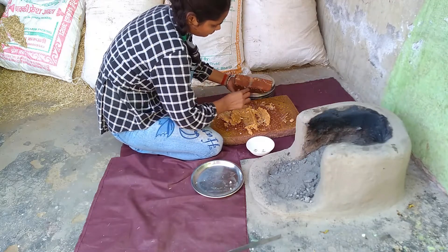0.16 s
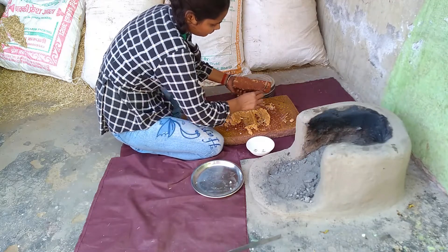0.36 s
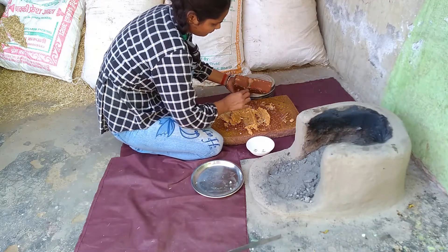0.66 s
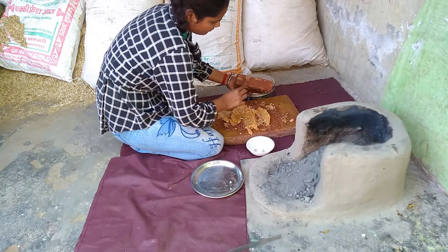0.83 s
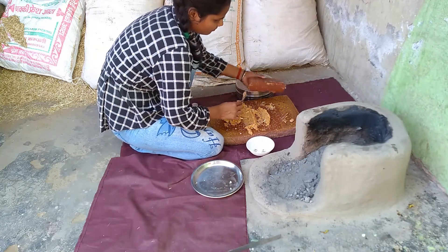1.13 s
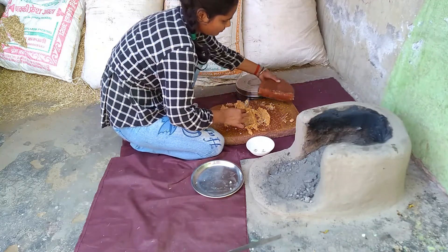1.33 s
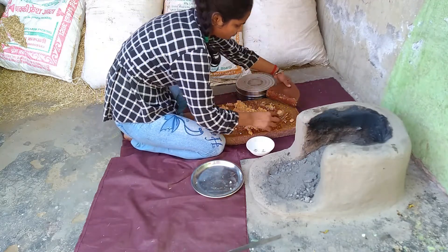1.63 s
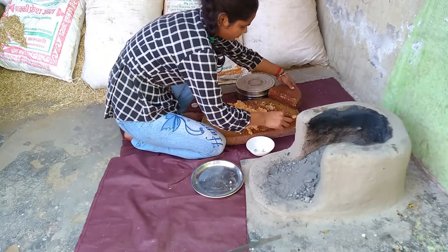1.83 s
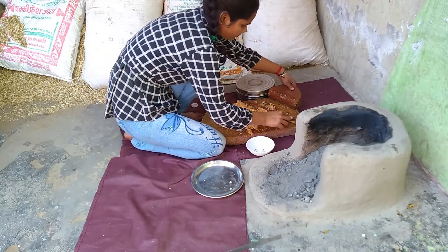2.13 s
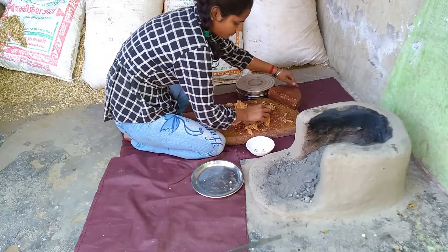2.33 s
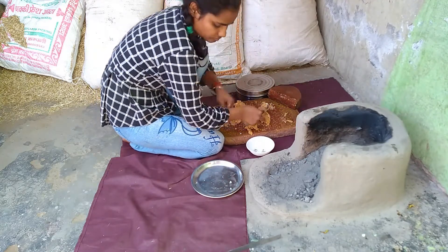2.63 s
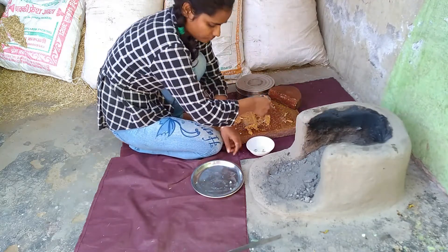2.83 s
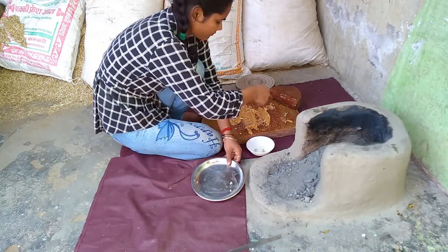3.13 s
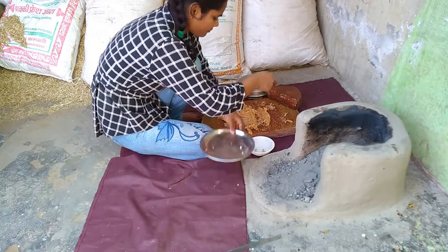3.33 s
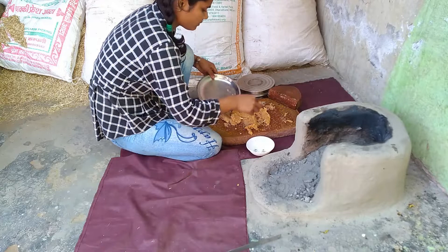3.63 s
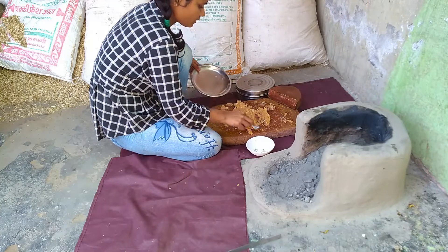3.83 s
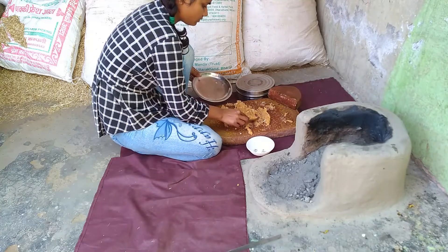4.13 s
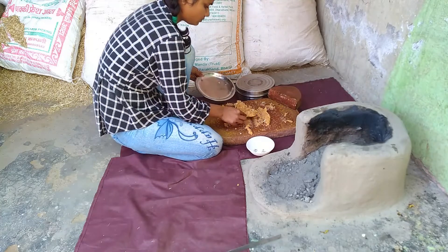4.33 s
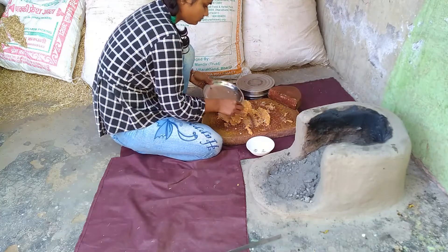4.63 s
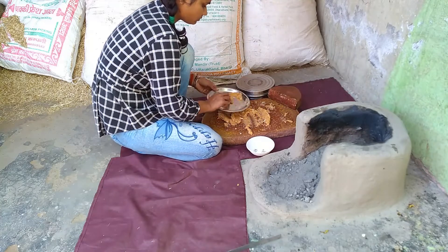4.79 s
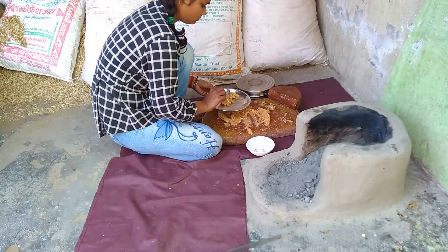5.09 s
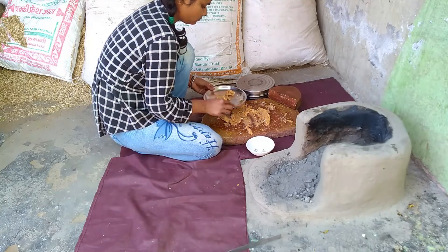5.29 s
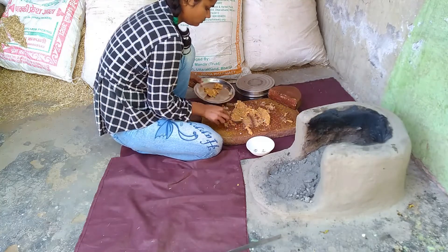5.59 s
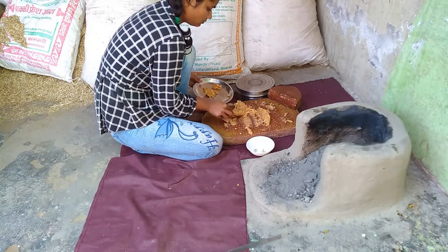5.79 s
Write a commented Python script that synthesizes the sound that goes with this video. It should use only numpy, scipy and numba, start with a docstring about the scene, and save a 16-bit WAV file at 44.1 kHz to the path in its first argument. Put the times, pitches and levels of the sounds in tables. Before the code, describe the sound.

In a small hard-walled room, fingers wipe mash off a stone roller in three short gritty strokes with tiny glass bangle chinks. The roller lands on the slab with dull knocks, then one sharp, loud clack. Quieter smears, finger scrapes and a soft rasp on a steel plate follow. Close microphone, low rumble and faint hiss.

```python
"""Fingers wipe mash off a stone roller in three gritty strokes at a grinding slab in a small room:
friction is a train of tiny random slips, shaped by resonances and by a pressure curve for each stroke.
Stone knocks, bangle chinks, plate taps and dull bumps are impacts that excite decaying modes.
Smears, slab scrapes, roller drags, sleeve rustles and a wiped steel plate are further friction.
Noise reflections place all this in the room, over a quiet rumble and hiss."""
import sys
import numpy as np
from scipy import signal
from scipy.fft import rfft, irfft, next_fast_len
from scipy.io import wavfile
from numba import njit

SR = 44100
rng = np.random.default_rng(int(sys.argv[2]) if len(sys.argv) > 2 else 0)


def dump(signal):
    """Clip the signal to [-1, 1] and save it as 16-bit WAV at the path in sys.argv[1]."""
    limited = np.clip(np.atleast_2d(signal).T, -1, 1)
    pcm = np.round(limited * 32767).astype(np.int16)
    wavfile.write(sys.argv[1], SR, pcm)


N = 262395
TIME = np.arange(N) / SR
RING_TIME = TIME[:SR]

# Levels are relative, before the trims of each layer and the room.
# Fingers scraping the slab: (start [s], attack [s], hold [s], fade [dB/s], peak level [dB],
# swell up to the peak [dB], treble relative to the body [dB], pitch ratio of the rings at the start)
SLAB_STROKES = [(4.005, 0.013, 0.045, 91, -43, 10, 0, .88), (5.617, 0.03, 0.07, 288, -38.5, 3.5, 0, 0.92)]


def undb(db):
    """Logarithmic level: decibels to an amplitude ratio."""
    return np.exp(np.asarray(db) * (np.log(10) / 20))


def unit(x):
    """Effective value: scale to rms 1."""
    return x / np.sqrt(np.mean(x ** 2))


def attack_unit(x, size=441):
    """Onset level: scale a blow to rms 1 over its first samples."""
    return x / np.sqrt(np.mean(x[:size] ** 2))


def add(out, s, x):
    """Superposition: mix a sound in at a time; a start before 0 becomes 0."""
    i = max(int(s * SR), 0)
    out[i:i + len(x)] += x[:N - i]


def colour(x, points):
    """Spectral envelope: zero-phase filter through points of (frequency [Hz], level [dB])."""
    hz, db = np.transpose(points)
    size = next_fast_len(len(x) + SR // 10)
    f = np.maximum(np.fft.rfftfreq(size, 1 / SR), 1)
    gain = undb(np.interp(np.log(f), np.log(hz), db))
    return irfft(rfft(x, size) * gain, size)[:len(x)]


def band(x, hz, width):
    """Simple resonator: one resonance of gain 1 at its centre."""
    quality = hz / min(width, SR / 4)
    return signal.lfilter(*signal.iirpeak(hz, quality, fs=SR), x)


def lowpass(x, hz, order=2):
    """Low-pass filtering: causal Butterworth roll-off above the cut-off."""
    return signal.sosfilt(signal.butter(order, min(hz, SR / 2 - 1), fs=SR, output="sos"), x)


def highpass(x, hz, order):
    """High-pass filtering: causal Butterworth roll-off below the cut-off."""
    return signal.sosfilt(signal.butter(order, hz, "high", fs=SR, output="sos"), x)


def resonate(x, rings):
    """Parallel resonators: each band is passed twice for steeper sides, and the sum has rms 1."""
    return unit(sum(undb(db) * band(band(x, hz, width), hz, width) for hz, width, db in rings))


def fade(t60):
    """Exponential damping: 60 dB down after t60 seconds."""
    return np.exp(-np.log(1000) * RING_TIME / t60)


def ring(modes):
    """Modal superposition: damped sines, with random signs for where the thing is struck."""
    out = np.zeros(len(RING_TIME))
    for hz, db, t60 in modes:
        sign = rng.choice([-1, 1])
        out += sign * undb(db) * fade(t60) * np.sin(2 * np.pi * hz * RING_TIME)
    return out


def walk(rate):
    """Slow random modulation: line segments between normal values, rate knots per second."""
    knots = rng.standard_normal(N // 10)
    return np.interp(TIME * rate, np.arange(len(knots)), knots)


def friction(rate, spread_db, slip_hz, slip_db):
    """Stick-slip: rate slips per second of uneven size, in a level that wanders at slip_hz."""
    hit = rng.random(N) < rate / SR
    excess = np.minimum(rng.exponential(size=N), 2 * np.pi)
    sizes = undb(spread_db * excess) * rng.choice([-1, 1], N)
    return unit(hit * sizes * undb(slip_db * walk(slip_hz)))


def gesture(s, attack_s, hold_s, fade_db_per_s, db, swell_db=0):
    """Pressure envelope of a stroke: it grips, swells as the hand presses on, then fades steadily."""
    grip_db = 20  # rise in level while the fingers take hold
    let_go_s = 0.012  # the release is rounded over this time
    t, length_s = TIME[:2 * SR], attack_s + hold_s
    grip = grip_db * np.clip(1 - t / attack_s, 0, 1) ** 2
    press = swell_db * np.clip(1 - t / length_s, 0, 1)
    release = fade_db_per_s * let_go_s * np.logaddexp(0, (t - length_s) / let_go_s)
    out = np.zeros(N)
    add(out, s, undb(db - grip - press - release))
    return out


@njit
def moving_band(x, hz, width):
    """Time-varying resonator: a state-variable filter whose centre moves."""
    y, b, l = np.empty(len(x)), 0., 0.
    for i in range(len(x)):
        g, k = np.tan(np.pi * min(hz[i], .45 * SR) / SR), width / hz[i]
        v = (b + g * (x[i] - l)) / (1 + g * (g + k))
        b, l, y[i] = 2 * v - b, l + 2 * g * v, k * v
    return y


def contact(slips, rings, pitch, flare_db, flare_hz):
    """Contact resonance: slips excite resonances that share a moving pitch and flare one by one."""
    out = slips.copy()
    for hz, width, db in rings:
        flare = undb(db + flare_db * walk(flare_hz))
        out += flare * moving_band(slips, hz * pitch, float(width))
    return out


def rub(slips, points, strokes, low_hz, split_hz, treble_db):
    """Friction radiation: one pressure curve shapes each stroke; a fixed balance sets its brightness."""
    x = colour(slips, points)
    body = signal.sosfiltfilt(signal.butter(8, split_hz, fs=SR, output="sos"), x)
    treble = unit(x - body)
    # only the body above low_hz counts toward its level
    body = body / np.std(highpass(body, low_hz, order=8))
    out = np.zeros(N)
    for *shape, bright_db in strokes:
        out += gesture(*shape) * (body + undb(bright_db + treble_db) * treble)
    return out


def gritty_pushes():
    """Coarse-grain friction: uneven slips of the fingers over bare stone excite its resonances."""
    # Gritty pushes of the fingers over bare stone, mostly the roller; the first two strokes along
    # the roller each get a second, harder push: (start [s], attack [s], hold [s], fade [dB/s],
    # peak level [dB], swell up to the peak [dB], treble relative to the body [dB])
    strokes = [(0.0, .022, 0.089, 183, -38, -1.5, -5), (0.049, 0.05, 0.05, 438.5, -29, 8.5, -5.5),
               (0.449, 0.027, .14, 216.5, -35.5, 0, -8.5), (0.527, 0.053, .02, 320, -24.5, 2.5, -4),
               (0.872, 0.054, 0.063, 278.5, -28, 0, -6.5), (2.609, 0.014, 0.043, 130.5, -65, -2.5, -10)]
    # Spectrum of the gritty friction: (frequency [Hz], level [dB])
    spectrum = [(240, -68.5), (400, -36), (1010, -29), (1250, -16.5), (1860, -11.5), (2010, -10.5),
                (2780, -7), (3000, -3), (4830, -4.5), (5300, -2), (6180, -10), (8670, -6.5), (10100, -18),
                (15100, -16.5), (15800, -29)]
    # Rings of the stone under the fingers: (frequency [Hz], width [Hz], level [dB])
    rings = [(2830, 63, -12.5), (5480, 170, 1), (7750, 210, 0), (8640, 1200, -4.5), (11300, 160, 6),
             (15230, 600, -3)]
    coarse = friction(rate=7500, spread_db=2.0, slip_hz=174.3, slip_db=1.0)
    slips = contact(coarse, rings, 1 + 0.0086 * walk(25), flare_db=0.5, flare_hz=44.1)
    return undb(-0.96) * rub(slips, spectrum, strokes, low_hz=1900, split_hz=6020, treble_db=0.0)


def bumps():
    """Damped impact: soft contacts give low thuds; small random ones jostle the roller in the hand."""
    # Dull jostling while the roller is wiped:
    # (start [s], attack [s], hold [s], fade [dB/s], peak level [dB])
    jostle = (-0.5, 0.1, 1.3, 119, -68)
    # Resonances of the jostling: (frequency [Hz], width [Hz], level [dB])
    jostle_rings = [(61.5, 16, -1), (105, 60, 0.5)]
    # Dull thuds of hands, knees and stone on the mat; the last is the plate being hit:
    # (time [s], level [dB], pitch [Hz])
    thuds = [(0.027, -47.5, 54.5), (.344, -54.5, 75), (.429, -50, 66), (0.676, -47.5, 49.6),
             (.865, -51, 70), (1.077, -37.5, 64), (1.093, -40.5, 185), (1.104, -44, 101), (1.169, -42, 56),
             (1.207, -49.5, 78), (1.286, -51, 68), (1.557, -54, 90), (1.72, -56.5, 80), (2.297, -52, 105),
             (3.828, -62.5, 332), (3.858, -47.5, 70.5), (3.866, -49.5, 176), (4.476, -56.5, 58),
             (4.87, -58, 437)]
    # Heavily damped modes of each thud: (pitch ratio, level [dB])
    thud_modes = [(.6, -2), (0.999, 0), (1.55, -5)]
    nudges = lowpass(friction(rate=25, spread_db=4.0, slip_hz=12, slip_db=1), 140, order=4)
    out = gesture(*jostle) * resonate(nudges, jostle_rings)
    for s, db, hz in thuds:
        thud = ring([(hz * ratio, level, 0.16) for ratio, level in thud_modes])  # t60 0.16 s
        add(out, s, undb(db) * lowpass(thud, 2 * hz, order=3))
    return out


def mash_smearing():
    """Lubricated friction: mash under the fingers, on stone and later on the plate, hisses smoothly."""
    # Smears, also as the fingers slide off the roller and later wipe on the plate:
    # (start [s], attack [s], hold [s], fade [dB/s], peak level [dB],
    # swell up to the peak [dB], treble relative to the body [dB])
    strokes = [(0.195, 0.039, 0.038, 280, -56, 0, -8.5), (0.707, 0.025, .06, 229, -60, -5, -4.5),
               (1.087, .03, 0.023, 126, -67.5, -8, -0.5), (1.543, 0.028, .03, 199, -82.5, -1, 5.5),
               (1.709, 0.023, .32, 100.5, -78.5, 4, -7), (2.42, .03, 0.037, 122, -81.5, -5, 9),
               (2.512, 0.035, 0.05, 220, -64, 19, 1.5), (2.62, 0.05, 0.045, 262, -53, 12.5, -6.5),
               (2.987, 0.018, .01, 200, -81.5, -2, 8.5), (3.149, 0.052, 0.083, 289, -68.5, 13, 10),
               (4.226, 0.022, .21, 152, -50, 11, -7), (4.648, 0.019, 0.032, 314, -62.5, 0, 2),
               (4.822, 0.022, 0.023, 254, -67, 6, 2.5), (5.083, 0.11, 0.22, 276, -52.5, -1.5, -8),
               (5.812, 0.053, 0.12, 200, -55.5, 9.5, 0)]
    # Spectrum of the smears: (frequency [Hz], level [dB])
    spectrum = [(710, -44), (1200, -19), (1460, -33), (1660, -24), (1990, -17.5), (2420, -21.5),
                (3640, -11), (4150, -19.5), (5200, -6), (7840, 4), (14800, -24), (15800, -21.5)]
    smooth = friction(rate=25000, spread_db=3.0, slip_hz=58.0, slip_db=.5)
    return undb(-1.32) * rub(smooth, spectrum, strokes, low_hz=4020, split_hz=9030, treble_db=1.5)


def rasp(hz, width, t60):
    """Noise-excited resonance: a decaying burst of slips in one twice-filtered band."""
    slips = rng.standard_normal(SR)
    return unit(band(band(slips, hz, width), hz, width)) * fade(t60)


def catches():
    """Frequency-dependent damping: landings rasp broadly, catches narrowly and shorter when higher."""
    # A finger lands on the stone: (time [s], level [dB], centre [Hz])
    landings = [(.415, -33.5, 5970), (.841, -45.5, 4600), (3.957, -37.5, 8400), (5.726, -45, 7600)]
    # A finger catches on grit or a sticky lump: (time [s], level [dB], centre [Hz])
    snags = [(2.905, -66, 5850), (3.958, -58, 1250), (4.022, -60.5, 1230), (4.055, -63, 1235),
             (4.091, -45, 5020), (4.094, -66, 1140), (4.116, -38, 6720), (4.158, -32.5, 6540),
             (4.196, -42.5, 3950), (4.212, -47, 3770), (4.229, -43.5, 3940), (4.255, -66, 1150),
             (4.284, -51.5, 4230), (4.371, -50, 3900), (5.676, -34.5, 9960)]
    out = np.zeros(N)
    for s, db, hz in landings:
        add(out, s, undb(db) * rasp(hz, width=5700, t60=0.11))
    for s, db, hz in snags:
        t60 = 0.087 * (1000 / hz) ** 0.42  # 0.087 s at 1 kHz
        add(out, s, undb(db) * rasp(hz, 0.26 * hz, t60))
    return out


def bangles():
    """Modal excitation: each touch of the glass bangles favours other modes, slightly detuned."""
    # Bangles touch: (time [s], level [dB], tilt toward the high modes [dB/octave])
    chinks = [(.664, -46.5, -5), (.693, -47, 15), (0.744, -48.5, -8), (.825, -54, -8), (0.842, -46.5, -11),
              (1.021, -47, -20.5), (1.09, -50.5, -51), (2.225, -46, 5), (2.379, -48.5, -65),
              (2.417, -63, 7.5)]
    # Modes of the bangles: (frequency [Hz], level [dB], t60 [s])
    glass_modes = [(7840, -3, 0.061), (7360, -3, 0.15), (8430, -3.5, 0.29), (8480, -4, 0.21),
                   (9500, -10.5, 0.22), (9924, -19, .15)]
    first_hz = glass_modes[0][0]  # the tilt pivots here
    out = np.zeros(N)
    for s, db, tilt_db in chinks:
        modes = []
        for hz, level, t60 in glass_modes:
            detune = 1 + 0.0054 * rng.standard_normal()
            modes.append((hz * detune, level + tilt_db * np.log2(hz / first_hz), t60))
        add(out, s, undb(db) * attack_unit(ring(modes)))
    return band(out, 8300, 3500)


def knocks():
    """Impact of solids: a crack, modes and a dense short tail; a softer contact cuts the treble."""
    # The roller meets the slab, with mash between them at times: (time [s], level [dB],
    # contact cut-off [Hz], tilt [dB/octave], pitch ratio of the roller's modes)
    blows = [(1.086, -37, 1600, -3, .85), (1.094, -37, 1500, -3, .85), (1.127, -45, 1650, -2, .85),
             (1.5575, -25, 1700, -3, 1.03), (1.618, -46, 1000, -4, 1.0), (1.7182, -23.3, 2600, -1, 1.065),
             (1.75, -38, 1500, -2, 1.06), (1.8, -52, 3000, -1, 1.06), (2.295, -15, 6500, 0, 1.0)]
    # Modes of the two stones: (frequency [Hz], level [dB], t60 [s])
    stone_modes = [(209.6, -4, 0.11), (303, -8.5, .12), (413.3, -6.5, 0.15), (449, -8.5, 0.13),
                   (572, -16.5, 0.22), (654, -11.5, .14), (760, -7.5, 0.17), (826, -6, 0.12),
                   (928, -8, 0.2), (1068, -4.5, 0.19), (1099, -1.5, 0.053), (1216.5, -2, 0.12),
                   (1341, -9, 0.14), (1435, -8.5, 0.079), (1513, -15.5, 0.19), (1810, -7, 0.11),
                   (1990, 3, 0.21), (2090, -4.5, .1), (2270, -5.5, 0.074), (2664, -7.5, 0.24),
                   (2670, -10.5, 0.13), (3010, -14, 0.11), (3920, -12, .06), (4550, -15, 0.055),
                   (5750, -14.5, .05), (5810, -10.5, .06)]
    # Spectrum of the dense tail: (frequency [Hz], level [dB])
    tail_spectrum = [(59, -45.5), (100, -16.5), (576, -4.5), (1250, -4), (1680, -13), (2000, -7),
                     (2190, -13.5), (2650, -13), (2850, -16.5), (9000, -37.5), (11700, -70.5),
                     (19800, -120)]
    # A steel dish beside the slab, faint in each knock: (frequency [Hz], level [dB], t60 [s])
    dish_modes = [(1998, -49, .5), (2080, -48, .65), (2180, -47.5, 0.71)]
    roller_modes_hz = 1800  # modes above this belong to the roller and shift with how it is held
    crack_rings = [(430, 530, -2.5), (1200, 990, -2), (1897, 500, 1.0), (4620, 960, -16.5)]  # Hz, Hz, dB
    crack = attack_unit(resonate(signal.unit_impulse(SR), crack_rings))
    dish = ring(dish_modes)
    out = np.zeros(N)
    for s, db, contact_hz, tilt_db, ratio in blows:
        held = [(hz * (ratio if hz > roller_modes_hz else 1), level, t60) for hz, level, t60 in stone_modes]
        modes = attack_unit(ring(held))
        tail = unit(colour(rng.standard_normal(SR), tail_spectrum)) * fade(0.16)
        blow = undb(-4) * crack + undb(-7.0) * modes + undb(-5) * tail + dish
        # the stones are too small to radiate deep bass
        blow = highpass(blow, 150, order=4)
        tilt = [(hz, tilt_db * np.log2(hz)) for hz in (300, 8000)]
        blow = undb(-3.5) * attack_unit(colour(blow, tilt))
        add(out, s, undb(db) * lowpass(blow, contact_hz, order=6))
    return out


def dragging():
    """Sliding friction: the roller grates softly between its knocks, through low resonances."""
    # The roller is pushed into place:
    # (start [s], attack [s], hold [s], fade [dB/s], peak level [dB])
    drags = [(1.575, 0.062, 0.023, 130, -59), (1.729, 0.033, 0.022, 173, -48.5),
             (1.899, .05, .005, 301.5, -67.5)]
    # Resonances of the drag: (frequency [Hz], width [Hz], level [dB])
    rings = [(550, 270, 2), (1107, 250, -5), (2280, 260, -10), (3250, 500, -20)]
    slips = friction(rate=9400, spread_db=2.5, slip_hz=50.7, slip_db=-0.36)
    return sum(gesture(*row) for row in drags) * resonate(slips, rings)


def tightening():
    """Contact stiffness: pressing fingers tighten the contact, so its pitch climbs in each stroke."""
    glide_per_s = 1.24  # rise of the pitch ratio, which stops at 2
    pitch = np.ones(N)
    for s, *_, ratio in SLAB_STROKES:
        climb = np.minimum(ratio + glide_per_s * (TIME - s), 2)
        pitch = np.where(TIME >= s, climb, pitch)
    return pitch


def slab_scraping():
    """Fine-grain friction: sparser slips excite the slab contact in strokes; the roller's slides along the edge
    stay unresonant."""
    # Spectrum of the scraping: (frequency [Hz], level [dB])
    spectrum = [(470, -67), (800, -34), (1090, -34), (1670, -33.5), (2250, -30), (2750, -16), (3760, -18),
                (4650, -7), (6270, -3), (6760, -5.5), (8680, -1.5), (9590, -3), (11300, -10.5),
                (12600, -11.5), (15800, -14.5)]
    # Rings of the finger contact on the slab: (frequency [Hz], width [Hz], level [dB])
    rings = [(1190, 95, -14), (2760, 960, 8.5), (4730, 64, -4), (5610, 150, 6.5), (6290, 60, 11.5),
             (7570, 150, -3), (9680, 160, 12), (10960, 730, 0), (13350, 400, 5)]
    # The roller slides across the slab's edge: (start [s], attack [s], hold [s], fade [dB/s], peak level [dB],
    # swell up to the peak [dB], treble relative to the body [dB])
    edge_slides = [(2.159, .012, 0.081, 520, -51, 7.5, 6), (2.31, 0.014, .025, 190, -64, 0, 4)]
    # Spectrum of the roller's slide along the edge: (frequency [Hz], level [dB])
    edge_slide_spectrum = [(470, -71.5), (800, -45.5), (1090, -26.5), (1570, -45.5), (1760, -41.5), (2680, -39),
                           (4050, -18), (5010, -23.5), (6120, -8.5), (7020, -18), (8260, -1.5), (8680, -1),
                           (10100, -16.5), (15800, -23)]
    fine = friction(rate=3500, spread_db=1.0, slip_hz=130, slip_db=2.9)
    pitch = tightening() * (1 + 0.018 * walk(50))
    slips = contact(fine, rings, pitch, flare_db=4.0, flare_hz=68.54)
    strokes = [row[:-1] for row in SLAB_STROKES]
    slab = rub(slips, spectrum, strokes, low_hz=4450, split_hz=6760, treble_db=3.0)
    edge_slide = rub(fine, edge_slide_spectrum, edge_slides, low_hz=4496, split_hz=7500, treble_db=2)
    return slab + undb(-1.15) * edge_slide


def sleeve():
    """Fibre friction: many small slips through broad resonances make a soft cloth rustle."""
    # Sleeves rustle as the plate is fetched and brought over:
    # (start [s], attack [s], hold [s], fade [dB/s], peak level [dB])
    rustles = [(2.53, .15, 0.028, 90, -83.5), (3.03, 0.15, .06, 70, -82), (3.812, 0.017, 0.026, 128.5, -83),
               (4.4, .25, 0.085, 59, -71.5)]
    fibres = friction(rate=2500, spread_db=2.0, slip_hz=60.4, slip_db=3)
    cloth = resonate(fibres, [(408, 190, 3.5), (836, 310, 3.5), (1450, 1170, -1.5)])  # Hz, Hz, dB
    return sum(gesture(*row) for row in rustles) * cloth


def plate():
    """Plate modes: taps ring the hand-held steel plate; wiping slips rasp through damped resonances."""
    # Fingers wipe the mash off on the plate; the negative hold starts the fade within the attack:
    # (start [s], attack [s], hold [s], fade [dB/s], peak level [dB])
    wipe = (4.825, 0.15, -0.015, 92, -54.5)
    # Resonances of the plate damped by the hand: (frequency [Hz], width [Hz], level [dB])
    wipe_rings = [(595, 1300, -5.5), (1458, 290, 6), (3130, 1000, -5), (3840, 420, -18), (5600, 240, -14),
                  (8600, 520, -24), (10200, 1000, -22)]
    # A finger and the mash hit the plate: (time [s], level [dB])
    taps = [(4.83, -54.5), (4.868, -55)]
    # Modes of the plate: (frequency [Hz], level [dB], t60 [s])
    modes = [(457, -15, 0.17), (1500, -0.5, 0.9), (1580, -5, 0.73), (1910, -22, 0.86), (3160, 3, 0.0576),
             (3700, 3, 0.048)]
    slips = friction(rate=4000, spread_db=3.0, slip_hz=59.7, slip_db=1.0)
    out = gesture(*wipe) * resonate(slips, wipe_rings)
    for s, db in taps:
        add(out, s, undb(db) * attack_unit(ring(modes)))
    return out


def room(x, wet_db, t60, late_db, late_t60, late_hz):
    """Reverberation: close walls answer at once as decaying noise; a faint dull tail lingers."""
    early = rng.standard_normal(SR) * fade(t60) * (RING_TIME > .003)
    late = lowpass(rng.standard_normal(SR), late_hz) * fade(late_t60)
    response = undb(wet_db) * early / np.linalg.norm(early) + undb(late_db) * late / np.linalg.norm(late)
    return x + signal.fftconvolve(x, response)[:N]


def background():
    """Stationary noise: a quiet rumble and hiss whose level wavers slightly."""
    # Spectrum of the background: (frequency [Hz], level [dB])
    spectrum = [(12, -26), (20, 6), (50, -3), (85, -6), (203, -15.5), (554, -24), (620, -21.5),
                (775, -28.5), (942, -25.5), (1050, -28), (1560, -30.5), (2430, -32), (7860, -33),
                (15800, -42.5)]
    noise = unit(colour(rng.standard_normal(N), spectrum))
    return undb(-67) * noise * undb(.7 * walk(9.9))


def scene():
    """Linear superposition: all handling sounds in the room, over the background."""
    rubbing = gritty_pushes() + mash_smearing() + slab_scraping() + dragging() + sleeve()
    impacts = bumps() + catches() + bangles() + knocks()
    work = rubbing + impacts + plate()
    wet = room(work, wet_db=-6.5, t60=0.039, late_db=-45, late_t60=0.92, late_hz=2200)
    return (wet + background())[None]


def record(dry):
    """Band limiting: a steep elliptic low-pass cuts the top above 15.8 kHz."""
    return signal.sosfilt(signal.ellip(10, .2, 80, 15800, fs=SR, output="sos"), dry)


dry = scene()
out = record(dry)
dump(out)
```